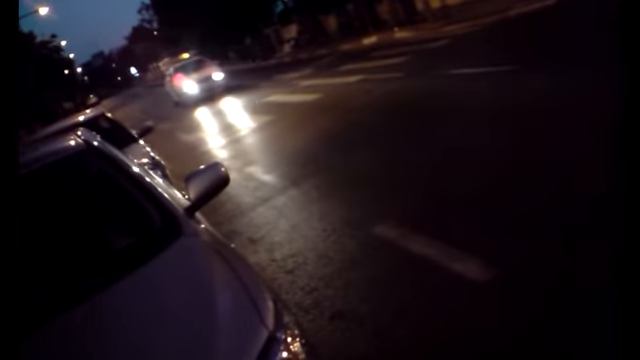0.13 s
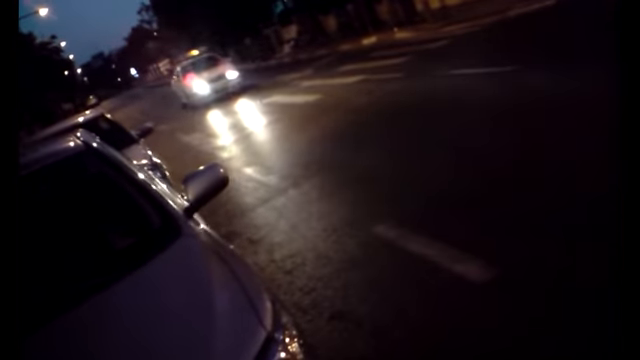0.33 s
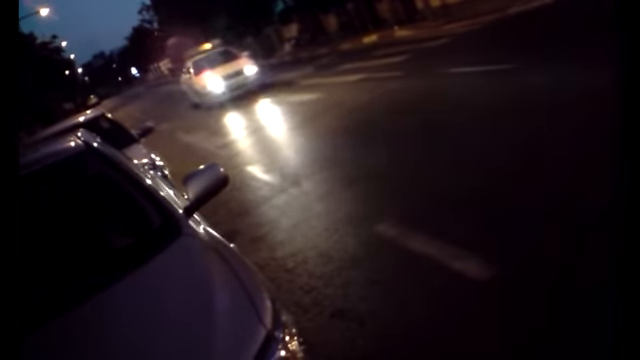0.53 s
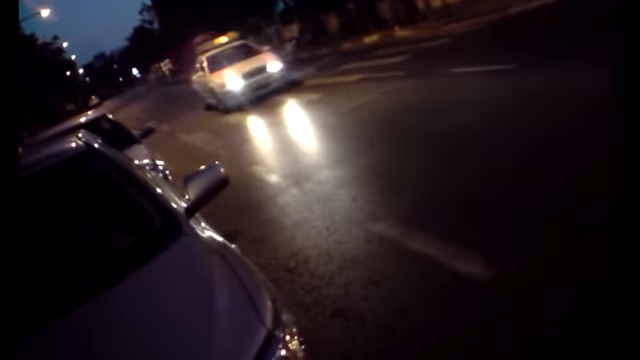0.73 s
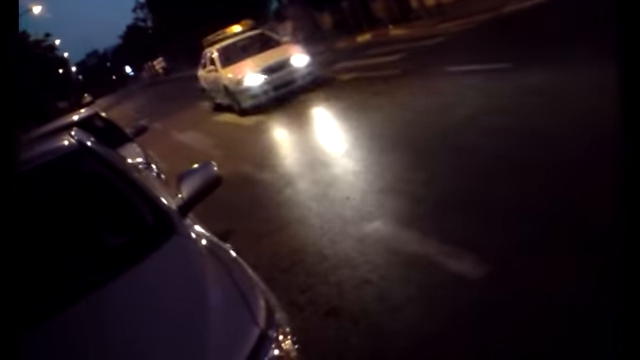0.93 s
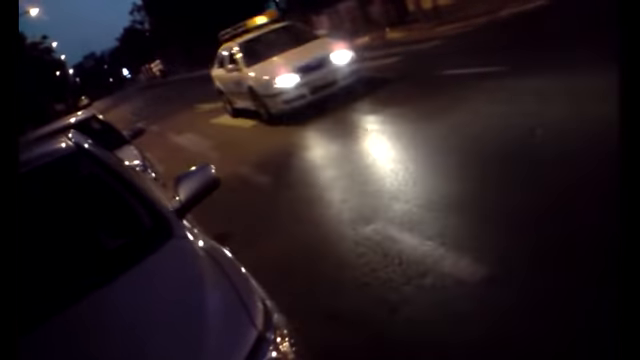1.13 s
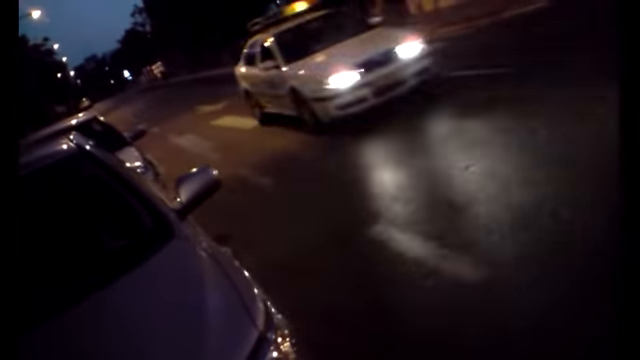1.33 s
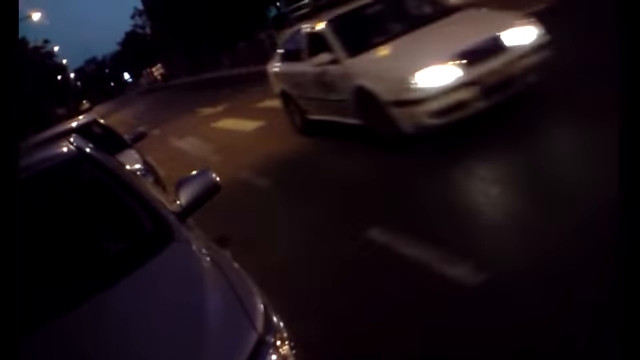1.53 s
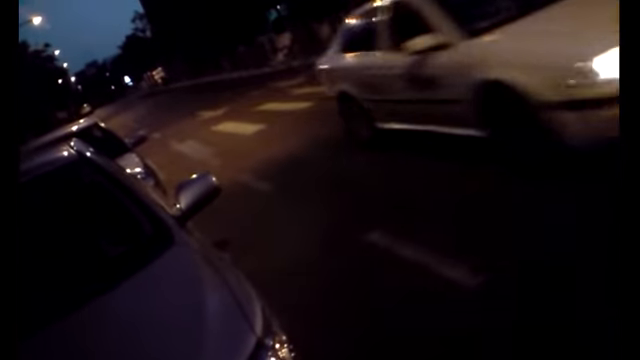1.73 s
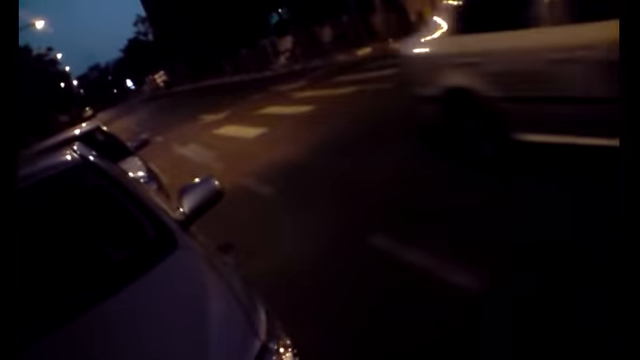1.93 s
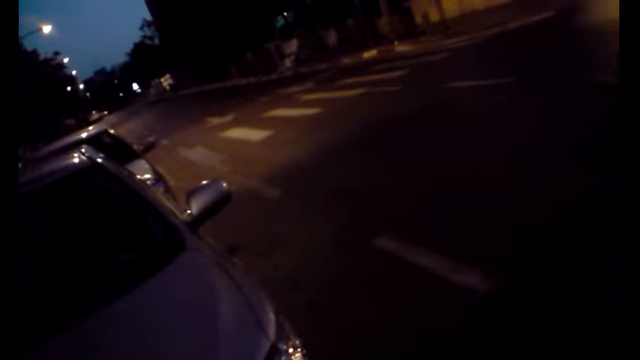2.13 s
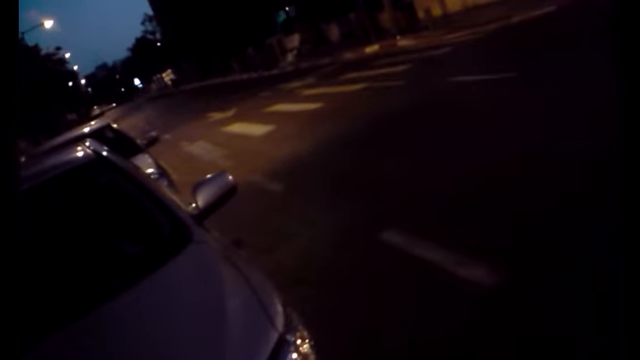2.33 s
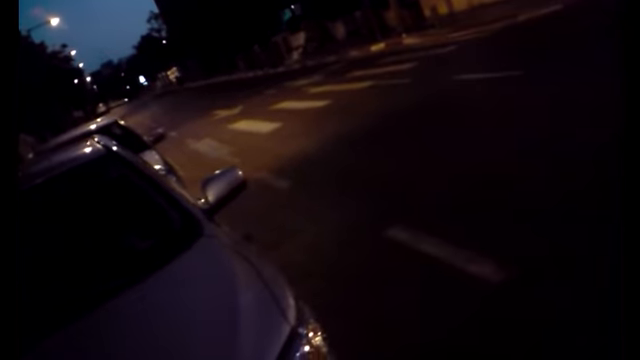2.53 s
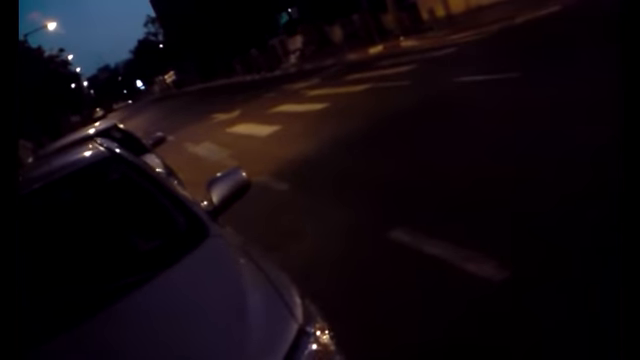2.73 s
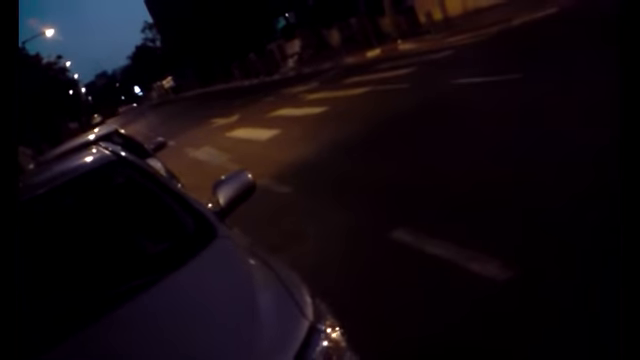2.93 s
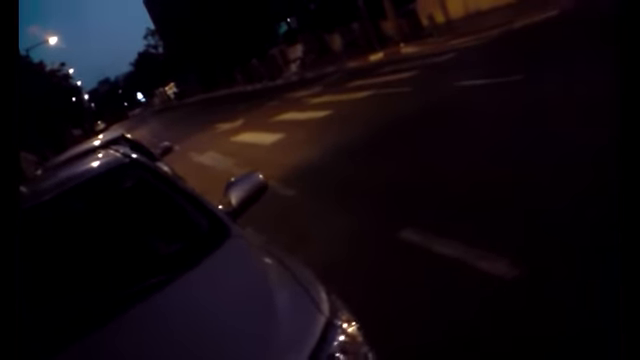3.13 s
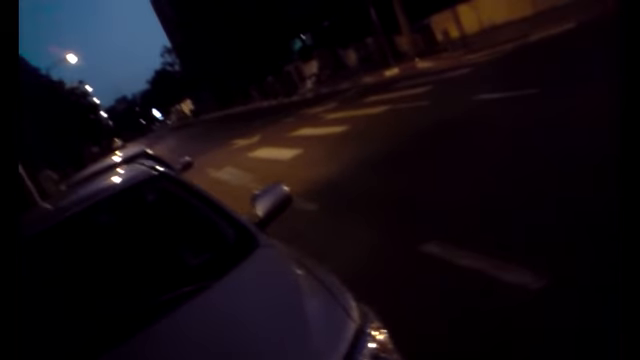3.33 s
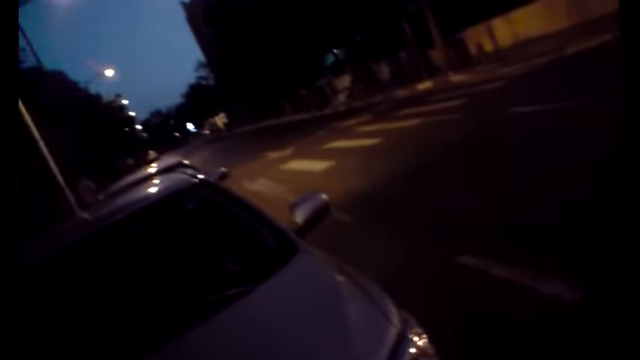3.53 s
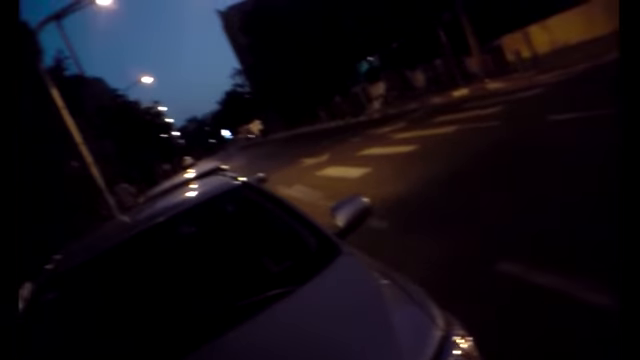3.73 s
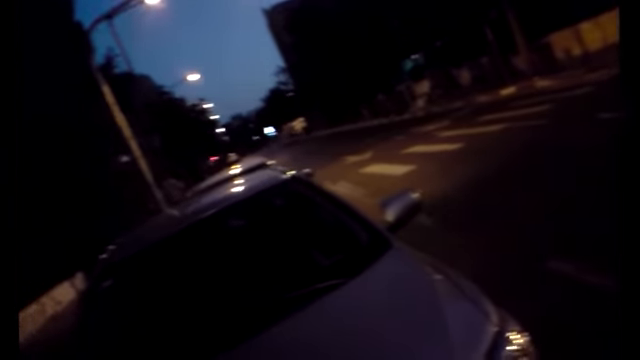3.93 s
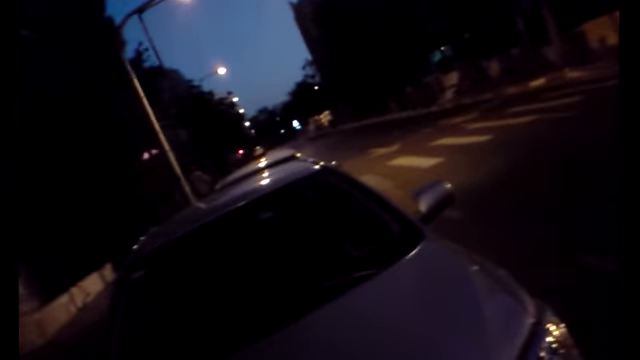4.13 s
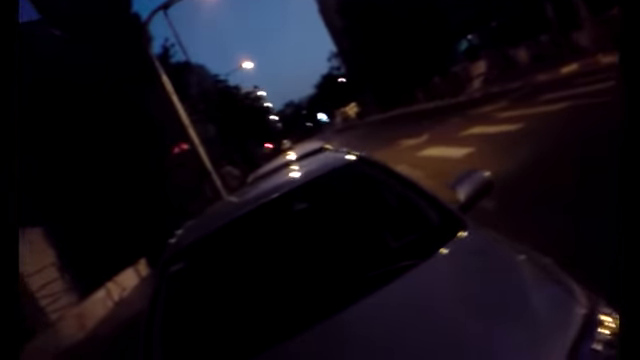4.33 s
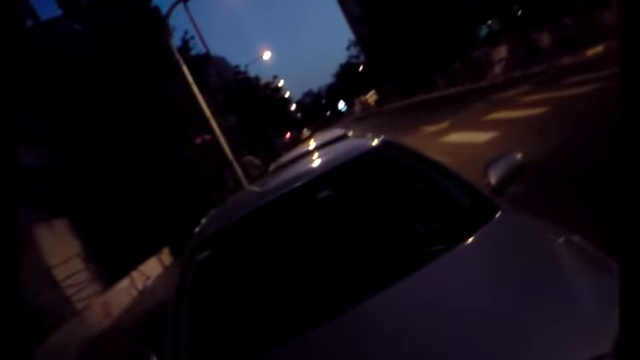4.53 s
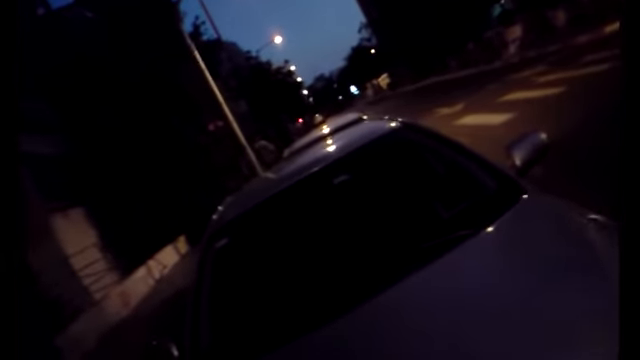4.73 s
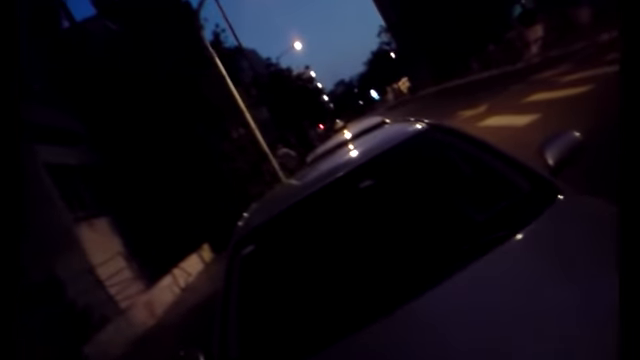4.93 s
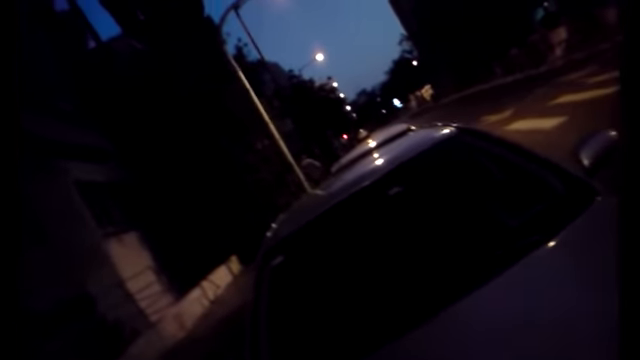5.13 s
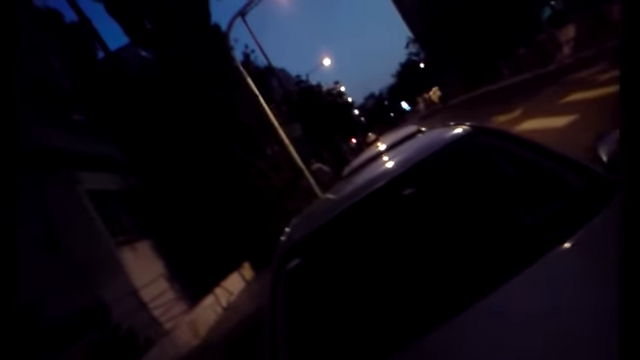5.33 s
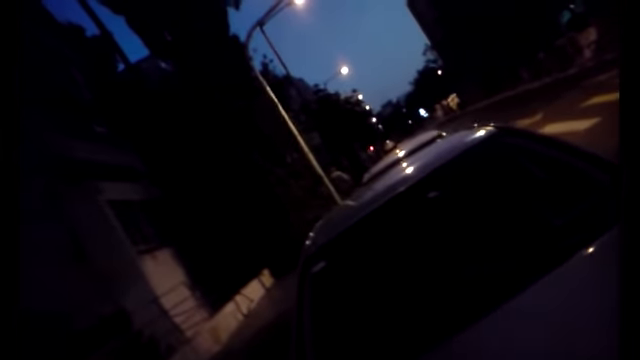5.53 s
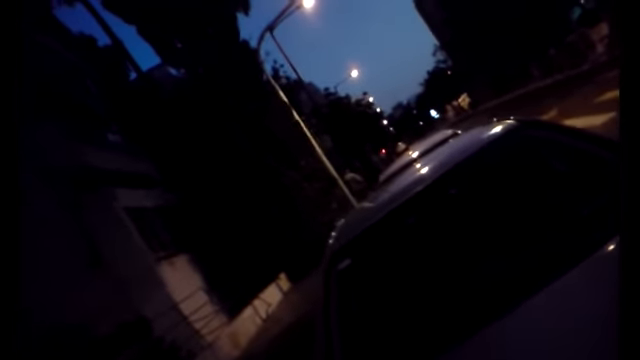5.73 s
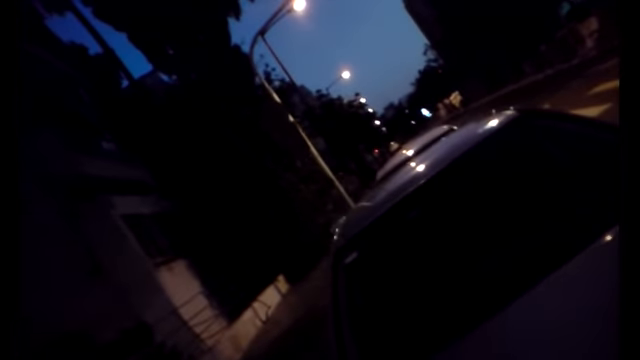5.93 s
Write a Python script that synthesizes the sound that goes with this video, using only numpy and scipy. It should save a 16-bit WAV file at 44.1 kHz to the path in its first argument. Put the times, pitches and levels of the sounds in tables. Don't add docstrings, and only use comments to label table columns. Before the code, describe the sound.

On a quiet wet street, a car approaches with steady tyre roar, tread hiss and a faint engine whine. It swells to a peak just after two seconds with small grit ticks, then the bright spray drops away quickly. The engine hum sinks in pitch as the car recedes. Brief bird whistles come near the end over faint town hum. Small camera microphone, mono, hissy with blippy treble.

```python
import sys
import numpy as np
from scipy import signal
from scipy.fft import rfft, irfft, dct, next_fast_len
from scipy.io import wavfile
from scipy.ndimage import uniform_filter1d, map_coordinates

SR = 44100
rng = np.random.default_rng(int(sys.argv[2]) if len(sys.argv) > 2 else 0)


def bounce(signal):
    frames = np.transpose(np.atleast_2d(signal))
    limited = np.clip(frames, -1, 1)
    pcm = np.round(limited * 32767).astype(np.int16)
    wavfile.write(sys.argv[1], SR, pcm)


def volts(x):
    e = np.asarray(x, float) / 20
    return 10 ** e


N = 268260

# frequency in Hz, level in dB per Hz.
TOWN_COLOUR = [(20, -18.5), (60, -14), (150, -3), (400, 1.5), (900, -6), (1800, -16), (3000, -10.5),
               (5000, -21.5)]
TOWN_DB = -56.5

# start in seconds, length in seconds, start pitch in Hz, end pitch in Hz, level in dB.
BIRD_NOTES = [
    (5.528, 0.021, 2760, 2670, -40.5),
    (5.77, 0.047, 1830, 1850, -42),
    (5.773, 0.04, 2690, 2740, -46.5),
    (5.803, .03, 2874, 2990, -37),
    (5.829, 0.02, 2460, 2640, -33),
    (5.85, 0.052, 2480, 2495, -46.5),
    (5.85, .025, 2104, 2230, -41),
    (5.878, 0.035, 2484, 2470, -40.5),
    (5.884, 0.031, 2106, 2270, -46.5),
    (5.91, 0.13, 2500, 2505, -54),
]

# start in seconds, pitch in Hz, peak level in dB.
GRIT_TICKS = [
    (2.2065, 1750, -9),
    (2.7172, 1850, -6.5),
]
GRIT_T60_S = 0.008

# start in seconds, end in seconds, start pitch in Hz, end pitch in Hz, level in dB.
GROOVE_SONGS = [
    (1.35, 2.05, 1320, 1550, -28),
    (1.698, 2.453, 899, 790, -29.5),
    (2.28, 2.579, 1050, 1219, -27),
    (3.692, 4.501, 1444, 1500, -44.5),
    (4.213, 4.997, 1088, 1138, -51),
]
GROOVE_WIDTH = 0.22

# time in seconds, rate in Hz.
FIRING_RATE = [(0.0, 86.3), (0.5, 85.75), (1.0, 83.45), (1.5, 80.14), (1.8, 79.7), (2.1, 74.4), (2.6, 71.5),
               (3.2, 67.3), (3.7, 61.4), (4.3, 56.5), (5.0, 49.9), (5.5, 47.4), (6.08, 42.1)]
# time in seconds, level in dB.
TAILPIPE_LEVEL = [(0.0, -64), (1.05, -67), (1.35, -60), (2.1, -51.5), (2.5, -53), (2.7, -61), (3.1, -60),
                  (3.3, -73), (3.8, -66), (4.15, -74), (6.08, -92)]
# start in seconds, end in seconds, level in dB.
OCTAVE_BOOMS = [(-.3, .2, -64), (0.252, 1.15, -57.5), (1.15, 1.696, -54.5), (1.95, 2.5, -49),
                (2.456, 3.03, -49.5), (3.07, 3.445, -48.5), (3.4, 3.9, -60), (3.92, 4.202, -63),
                (4.25, 4.695, -67), (4.8, 5.1, -67.5), (5.203, 5.45, -69)]
# multiple of the firing rate, start in seconds, end in seconds, level in dB.
ENGINE_ORDERS = [
    (4, -.9, 1.5, -50.5),
    (7.03, -.8, 1.7, -43),
    (5, .7, 1.95, -43),
    (4.22, 1.4, 2, -46),
    (3, 1.95, 2.8, -49.5),
    (6, 3.2, 4, -54),
    (3, 3.25, 3.75, -60),
    (4, 4.55, 5.7, -64),
    (3, 5, 6.1, -73),
]

# frequency in Hz, level in dB per Hz.
RUMBLE_COLOUR = [(15, -23.5), (60, -26), (150, -16), (300, -5), (500, -2.5), (700, 0), (1200, -34.5)]
ROAR_COLOUR = [(350, -22.5), (600, -9), (800, -3), (1200, -0.5), (1600, -5.5), (2300, -32)]
TREAD_COLOUR = [(1000, -48), (1400, -5), (1700, 1), (2200, -1.5), (2800, -5.5), (3400, -13), (4500, -39.5)]
SPRAY_COLOUR = [(2000, -34), (2900, 2.5), (3500, 2), (4700, -1.5), (5200, -8.5), (5700, -13.5), (7500, -18),
                (8600, -27), (10200, -30), (11000, -46)]
# time in seconds, tyre loudness in dB,
# shade on the wet contact patches in dB (0 in open sight).
CAR_PASSING = [(0.0, -32, -4), (0.4, -31.5, -3), (0.9, -30.5, -3.5), (1.3, -28, -2), (1.7, -26.5, -1),
               (1.95, -24, -0.5), (2.2, -23.5, -2), (2.35, -23, -5), (2.47, -24, -7.5), (2.6, -25, -10.5),
               (2.75, -28, -10.5), (2.9, -31, -11), (3.25, -32, -11.5), (3.8, -35, -8.5), (4.2, -40, -8.5),
               (4.7, -42.5, -7.5), (5.2, -44, -7.5), (5.75, -45.5, -9.5)]
# level at the closest point in dB,
# share of the rise and fall it follows, share of the shade it takes.
RUMBLE_FOLLOWS = (-34.5, 0.86, -0.29)
TREAD_FOLLOWS = (-22.5, 1, 0.44)
SPRAY_FOLLOWS = (-26, 0.95, 1.045)
CLOSEST_DB = -24

# frequency in Hz, gain in dB.
MIC_COLOUR = [(1600, 0), (1950, -2.5), (2400, 0.5), (2900, -1.5), (3300, -2.5), (3800, 0.5), (4400, 1.5),
              (5000, 1)]
# frequency in Hz, level in dB per Hz.
HISS_COLOUR = [(200, 1.5), (5000, -2), (9300, -2.5), (10000, -5), (10700, -9), (11200, -15), (11300, -48)]
HISS_DB = -53
# frequency in Hz, step size in dB.
CAMERA_STEP = [(100, -20.5), (3000, -8.5), (6000, -2.5), (7500, -1.5), (8500, 0.5), (10000, -1),
               (11000, -3.5)]


def unit(x):
    return x / np.sqrt(np.mean(x ** 2) + 1e-20)


def curves(rows):
    s, *cols = np.transpose(rows)
    return [np.interp(np.arange(N) / SR, s, c) for c in cols]


def swell(start, end):
    return np.sin(np.pi * np.clip((np.arange(N) / SR - start) / (end - start), 0, 1))


def wobble(rate):
    knots = rng.standard_normal(int(N * rate / SR) + 4)
    return map_coordinates(knots, [np.arange(N) * rate / SR])


def along(points, hz):
    f, db = np.transpose(points)
    return volts(np.interp(np.log(hz + 1), np.log(f + 1), db))


def coloured(x, spectrum):
    m = next_fast_len(N + 8192)
    hz = np.fft.rfftfreq(m, 1 / SR)
    inside = (hz > spectrum[0][0]) & (hz < spectrum[-1][0])
    return unit(irfft(rfft(x, m) * along(spectrum, hz) * inside, m)[:N])


def patchy(patchy_db, grain_db=0):
    x = rng.standard_normal(N) * volts(grain_db * rng.exponential(1, N))
    z = signal.stft(x, nperseg=1024)[2]
    field = uniform_filter1d(rng.standard_normal(z.shape), size=7, axis=0)
    field = uniform_filter1d(field, size=14, axis=1)
    return signal.istft(z * volts(patchy_db * unit(field)), nperseg=1024)[1][:N]


def town():
    return volts(TOWN_DB) * coloured(patchy(patchy_db=3.5), TOWN_COLOUR)


def bird():
    notes = np.zeros(N + SR)
    for s, length, start_hz, end_hz, db in BIRD_NOTES:
        u = np.linspace(0, 1, int(length * SR))
        bend_hz = 25 * rng.standard_normal() * np.sin(14 * u)
        turn = 2 * np.pi * np.cumsum(start_hz + (end_hz - start_hz) * u + bend_hz) / SR
        flutter_db = 2.5 * np.sin(190 * length * u * 2 * np.pi)
        shape = np.sqrt(np.sin(np.pi * u) + 1e-9)
        notes[round(s * SR):][:len(u)] += volts(db + 0.5 + flutter_db) * shape * np.sin(turn)
    t = np.arange(SR // 2) / SR
    street = rng.standard_normal(len(t)) * volts(-60 * t / 0.52) * (t > 0.012)
    echoes = signal.fftconvolve(notes, street / np.linalg.norm(street))[:N]
    return notes[:N] + volts(-4.5) * echoes


def grit():
    ticks = np.zeros(N + SR)
    t = np.arange(SR // 50) / SR
    onset = 1 - np.exp(-t / 0.0003)
    for s, hz, db in GRIT_TICKS:
        ticks[round(s * SR):][:len(t)] += volts(db - 60 * t / GRIT_T60_S) * np.sin(2 * np.pi * hz * t) * onset
    return ticks[:N]


def grooves():
    sound = np.zeros(N)
    for start, end, start_hz, end_hz, db in GROOVE_SONGS:
        width_hz = GROOVE_WIDTH * start_hz
        pitch_hz = np.interp(np.arange(N) / SR, [start, end], [start_hz, end_hz])
        turn = 2 * np.pi * np.cumsum(pitch_hz) / SR
        band = wobble(width_hz) * np.cos(turn) + wobble(width_hz) * np.sin(turn)
        sound += volts(db) * swell(start, end) * unit(band)
    return sound


def engine():
    firing_hz = curves(FIRING_RATE)[0] + 0.12 * wobble(6)
    turn = 2 * np.pi * np.cumsum(firing_hz) / SR
    tone_db, = curves(TAILPIPE_LEVEL)
    octave = sum(volts(db - 1.5) * np.abs(swell(start, end)) ** 0.52 for start, end, db in OCTAVE_BOOMS)
    sound = volts(tone_db) * np.sin(turn)
    sound += octave * volts(0.69 * wobble(7)) * np.sin(2 * turn)
    for multiple, start, end, db in ENGINE_ORDERS:
        waver_db = 1.2 * wobble(7)
        sound += volts(db + waver_db) * np.sqrt(np.abs(swell(start, end))) * np.sin(multiple * turn)
    return np.sqrt(2) * sound


def tyres():
    roar_db, shade_db = curves(CAR_PASSING)
    rumble_db, tread_db, spray_db = (
        db + grows * (roar_db - CLOSEST_DB) + share * shade_db
        for db, grows, share in (RUMBLE_FOLLOWS, TREAD_FOLLOWS, SPRAY_FOLLOWS))
    bumps = wobble(18)
    rumble = volts(rumble_db) * coloured(patchy(patchy_db=-1.6), RUMBLE_COLOUR)
    roar = volts(roar_db + 0.44 * bumps) * coloured(patchy(patchy_db=1.08), ROAR_COLOUR)
    tread = volts(tread_db + 0.31 * bumps) * coloured(patchy(patchy_db=0.9, grain_db=1.5), TREAD_COLOUR)
    splashes_db = 0.4 * wobble(30.01)
    spray = volts(spray_db + splashes_db) * coloured(patchy(patchy_db=0.86, grain_db=1.5), SPRAY_COLOUR)
    return rumble + roar + tread + spray


def scene():
    car = tyres() + grooves() + grit() + engine()
    return (town() + bird() + car)[None]


def camera_memory(x, size=528, count=24):
    blocks = np.pad(x, (size, 2 * size - N % size)).reshape(-1, size)
    rise = np.sin(np.pi / 2 * np.sin(np.pi * (np.arange(size) + 0.5) / (2 * size)) ** 2)
    a, b = np.split(blocks[:-1] * rise, 2, axis=1)
    c, d = np.split(blocks[1:] * rise[::-1], 2, axis=1)
    lines = dct(np.hstack([-c[:, ::-1] - d, a - b[:, ::-1]]), type=4, norm="ortho")
    logs = np.log(np.abs(lines[:, size // 40:size // 4]) + 1e-9)
    level = np.exp(np.mean(logs, axis=1, keepdims=True)) / volts(-33.5)
    bands = np.repeat(rng.standard_normal((len(lines), count)), size // count, axis=1)
    frames = rng.standard_normal(level.shape)
    step = volts(-39.5 + 1.5 * bands + 1.2 * frames) * (level + 1e-6) ** 0.74
    step = step * along(CAMERA_STEP, (np.arange(size) + 0.5) * SR / (2 * size))
    rounded = np.sign(lines) * np.floor(np.abs(lines) / step + 0.4) * step
    p, q = np.split(dct(rounded, type=4, norm="ortho"), 2, axis=1)
    first = np.hstack([q, -q[:, ::-1]]) * rise
    second = np.hstack([-p[:, ::-1], -p]) * rise[::-1]
    return (first[1:] + second[:-1]).ravel()[:N]


def band_limit(x):
    return signal.sosfilt(signal.butter(12, 11140, fs=SR, output="sos"), x)


def record(dry):
    m = next_fast_len(N + 8192)
    heard = irfft(rfft(dry[0], m) * along(MIC_COLOUR, np.fft.rfftfreq(m, 1 / SR)), m)[:N]
    heard = heard + volts(HISS_DB) * coloured(rng.standard_normal(N), HISS_COLOUR)
    stored = camera_memory(heard)
    return band_limit(stored[None])


dry = scene()
out = record(dry)
bounce(out)
```